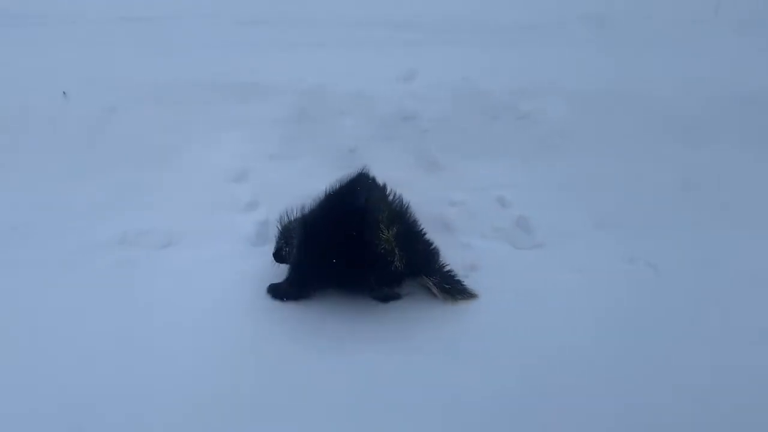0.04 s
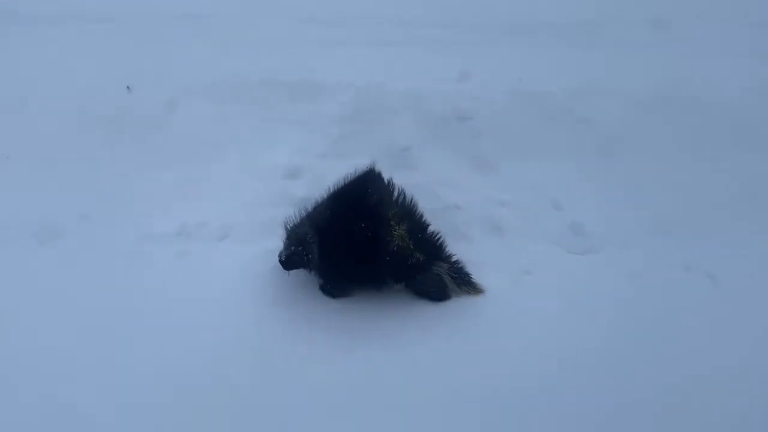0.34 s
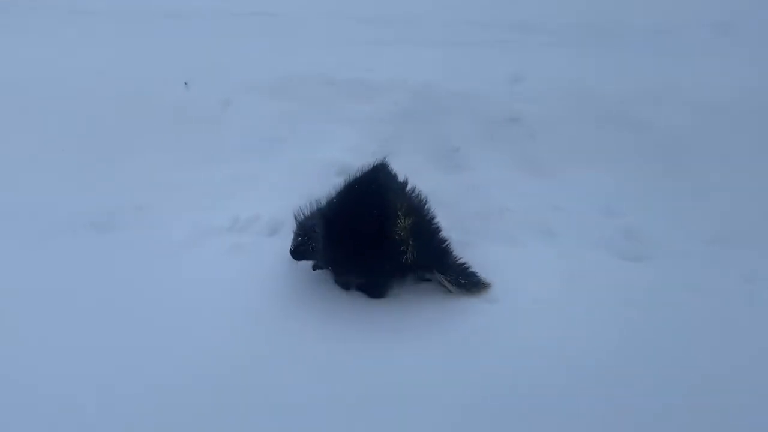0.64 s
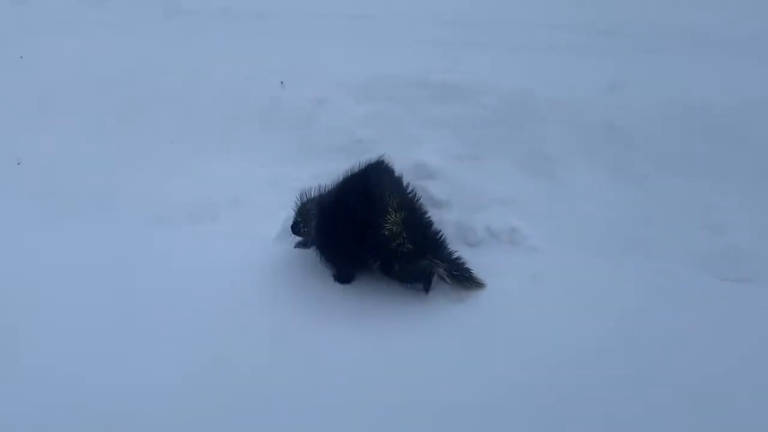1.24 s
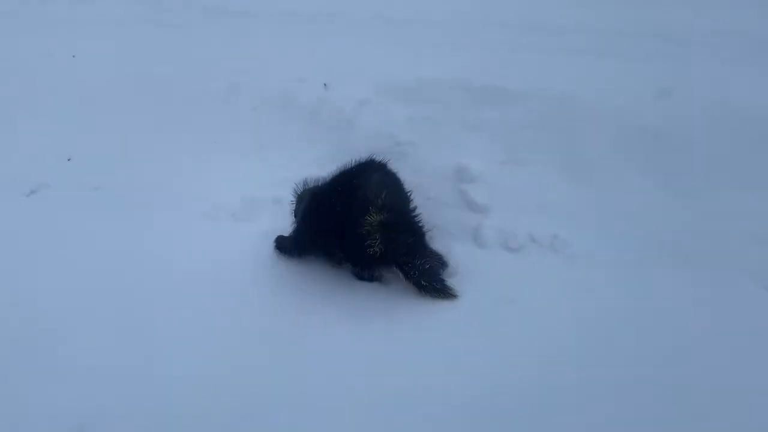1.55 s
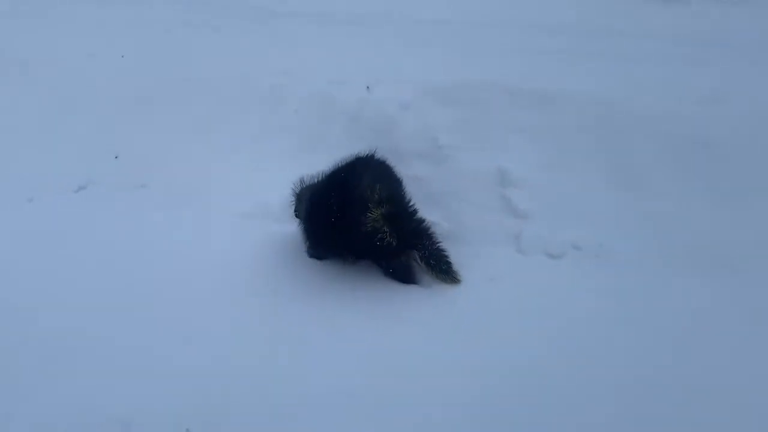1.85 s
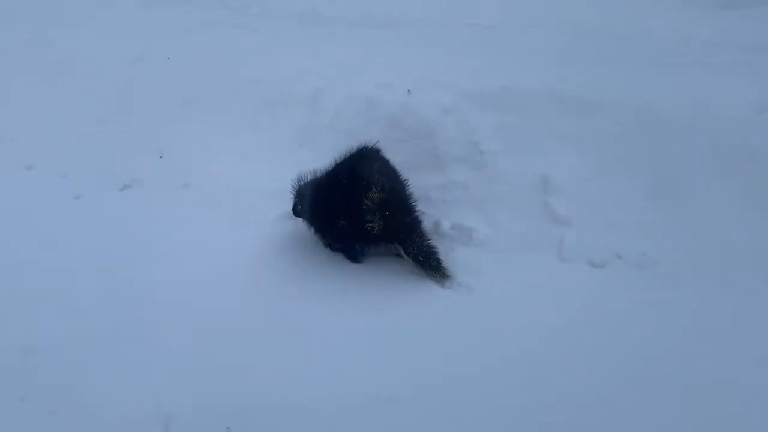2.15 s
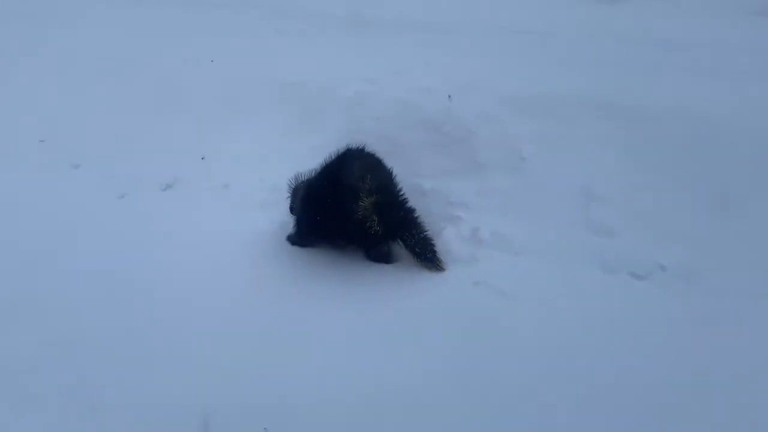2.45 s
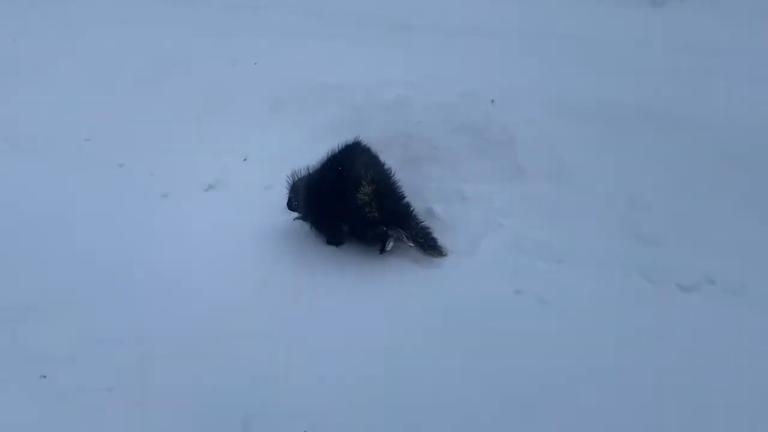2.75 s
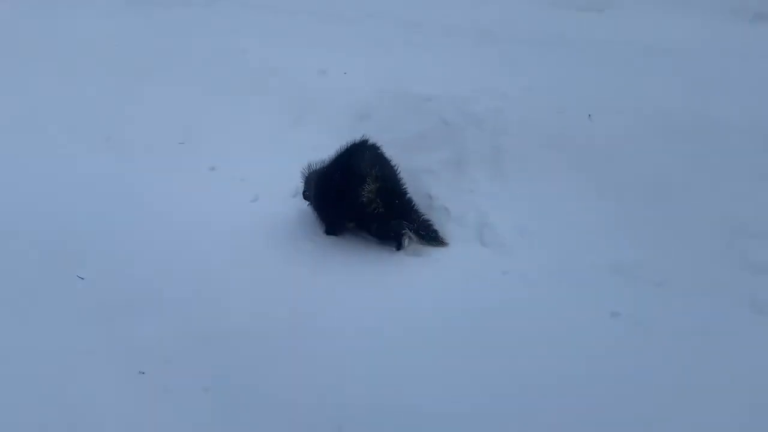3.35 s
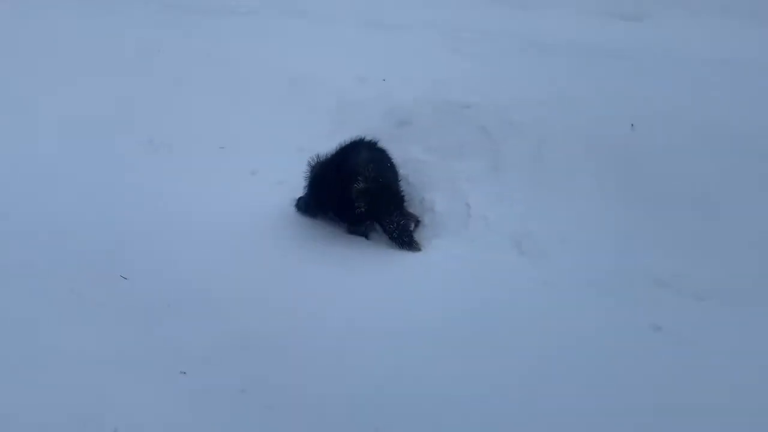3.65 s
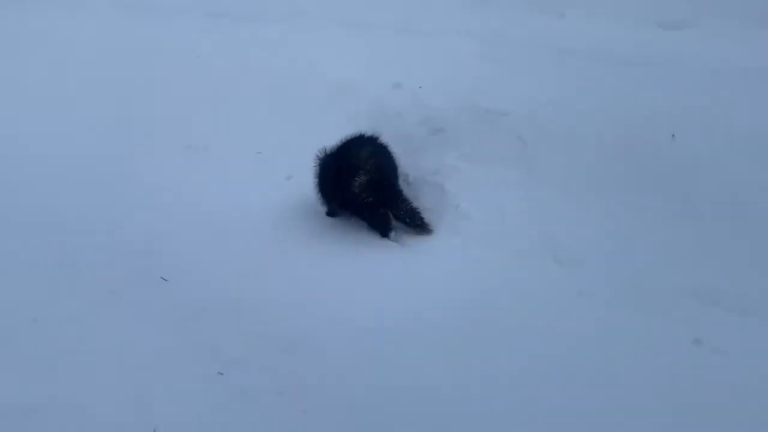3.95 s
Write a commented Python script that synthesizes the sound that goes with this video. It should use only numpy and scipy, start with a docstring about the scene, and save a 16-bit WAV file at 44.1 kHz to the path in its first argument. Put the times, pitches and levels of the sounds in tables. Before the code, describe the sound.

An engine idles nearby with a deep hum while wind thumps the microphone.

```python
"""An engine idles close by on open snow: a deep firing hum, light clatter and a rush of fan air.
Wind thumps the microphone, mostly in the first second and a half, among faint crisp rustles.
As the microphone slowly turns, the rush dulls and shifts between the ears, and a hollow sweeps up
through rush and clatter. From about 2 s the clatter comes forward and a few dry ticks sound."""
import sys
import numpy as np
from scipy import signal
from scipy.fft import rfft, irfft
from scipy.io import wavfile
from scipy.ndimage import uniform_filter1d, map_coordinates

SR = 44100
rng = np.random.default_rng(int(sys.argv[2]) if len(sys.argv) > 2 else 0)


def generate_wav(sig):
    """Save sig (samples, or channels by samples) to the path in sys.argv[1] as 16-bit PCM at SR."""
    pcm = np.round(np.clip(np.atleast_2d(sig).T, -1, 1) * 32767).astype(np.int16)
    wavfile.write(sys.argv[1], SR, pcm)


N = 176400
T = np.arange(N) / SR
HZ = np.maximum(np.arange(N // 2 + 1) * SR / N, 1)
FIRING_HZ, CYLINDERS = 62.13, 6


def from_db(db):
    """Decibels to gain."""
    return 10 ** (np.asarray(db) / 20)


def unit_rms(x):
    """Scale to rms 1."""
    return x / np.sqrt(np.mean(x ** 2) + 1e-20)


def in_time(points):
    """Control curve at every sample."""
    return np.interp(T, *np.transpose(points))


def over_hz(points):
    """Curve at every FFT bin, interpolated in log frequency."""
    hz, value = np.transpose(points)
    return np.interp(np.log(HZ), np.log(hz), value)


def drift(rate_hz):
    """Smooth random motion, mean 0, rms 1."""
    slow = irfft(rfft(rng.standard_normal(N)) / (1 + (HZ / rate_hz) ** 2), N)
    return unit_rms(slow - slow.mean())


def colour(x, spectrum):
    """Filter by a spectrum; rms 1."""
    return unit_rms(irfft(rfft(x) * from_db(over_hz(spectrum)), N))


def noise_pair(correlation):
    """White stereo noise with a given left-right correlation."""
    mid, side = rfft(rng.standard_normal((2, N)))
    correlation = np.clip(correlation, -.99, .99)
    return irfft(np.sqrt(1 + correlation) * mid + np.sqrt(1 - correlation) * side * [[1], [-1]], N)


def ports(x, left_db, left_lead_rad):
    """Level and phase difference between the two microphone ports, at constant power."""
    gain, twist, _ = np.broadcast_arrays(from_db(left_db), np.exp(.5j * left_lead_rad), HZ)
    return irfft(rfft(x) * np.array([gain * twist, 1 / twist]) * np.sqrt(2 / (1 + gain ** 2)), N)


def engine_tones(cycles, orders, waver_db=.47):
    """Wavering multiples of the engine cycle, in step as in a pulse train."""
    out = 0
    for order, level_db in orders:
        peak = np.sqrt(2) * from_db(level_db + waver_db * drift(2.5))
        out = out + peak * np.sin(2 * np.pi * order * cycles)
    return out


def throb(cycles, knock_depth, crank_depth):
    """Gain that beats twice per firing and once per crank turn."""
    crank_rad = 4 * np.pi * cycles
    return unit_rms(np.exp(knock_depth * np.cos(CYLINDERS * crank_rad) + crank_depth * np.cos(crank_rad)))


def exhaust_hum(cycles, left_lag_s=.00035):
    """Deep firing tones, uneven from one firing to the next."""
    # exhaust harmonics: cycle_order, level_db
    harmonics = [(4, -54.5), (6, -26), (8, -41.5), (10, -59.5), (12, -22), (14, -45), (18, -37),
                 (20, -62.5), (24, -46.5), (30, -53.5), (34, -56.5)]
    hum = engine_tones(cycles, harmonics)
    chug_db = drift(35)
    pan_db = .46 - .5 * T
    left, right = hum * from_db(chug_db + pan_db * [[.5], [-.5]])
    return np.array([np.interp(T - left_lag_s, T, left), right])


def clatter(cycles, repeat_share=.55):
    """Valve and injector noise, partly the same in every cycle, with a thin whine on top."""
    # knock spectrum: freq_hz, gain_db
    spectrum = [(250, -2.5), (340, -2), (450, -15.5), (660, 6.5), (1000, -1), (1250, -20), (1650, -8),
                (2300, -25.5), (5000, -42)]
    # knock envelope: time_s, level_db
    envelope = [(0, -58), (.7, -59), (1.4, -58.5), (2.2, -51.5), (2.8, -45), (3.3, -43.5), (3.65, -46),
                (4, -51.5)]
    # whine tones: cycle_order, mean_level_db
    whine_orders = [(52, -54), (54, -53.5), (64, -54), (66, -51.5)]
    # port balance: freq_hz, left_minus_right_db
    balance = [(300, 1), (450, 1.5), (650, -6), (1000, -12), (1300, -5.5), (1650, -3.5), (2500, -5)]
    # port phase: freq_hz, left_lead_rad
    lead = [(300, -1), (450, 3.0), (650, 2), (950, 2), (1250, 0.5), (1600, 4), (2200, 1.5)]
    cycle_samples = int(SR * CYLINDERS / FIRING_HZ)
    fresh, pattern = rng.standard_normal((2, N))
    position = cycles % 1 * cycle_samples
    repeated = unit_rms(np.interp(position, np.arange(cycle_samples), pattern[:cycle_samples]))
    noise = np.sqrt(repeat_share) * repeated + np.sqrt(1 - repeat_share) * fresh
    knocks = colour(noise * throb(cycles, knock_depth=.5, crank_depth=.1), spectrum)
    level_db = in_time(envelope)
    whine = engine_tones(cycles, whine_orders) * from_db(.37 * (level_db - level_db.mean()))
    return ports(knocks * from_db(level_db) + whine, over_hz(balance), over_hz(lead))


def fan_rush(cycles, rush_db=-37.5, tone_db=-56.5, tone_hz=2037, tone_width_hz=45):
    """Fan air with one narrow resonance; the treble is shaded as the microphone turns."""
    # rush before the turn: freq_hz, gain_db
    spectrum = [(200, -14), (330, -3), (480, 7), (700, 2), (950, -0.5), (1150, -2), (1400, -5),
                (1750, -7.5), (2050, -11.5), (2500, -13), (3200, -17), (4100, -25.5), (5600, -27),
                (6800, -35.5), (10000, -46), (15000, -52)]
    # likeness of the ports: freq_hz, correlation
    likeness = [(200, 1), (500, 0.89), (1400, 0.93), (2600, 0.55), (3700, 0.93), (6000, 0.66), (12000, .6)]
    # shading at weight 1: time_s, gain_db
    shading = [(0, 0), (.6, -.3), (1.2, -2), (1.9, -5), (2.6, -8.5), (3.2, -12), (4, -16)]
    # shading by band: centre_hz, weight
    bands = [(330, -.1), (470, 0.9), (700, 0.4), (1050, 0.5), (1700, 0.1), (2400, 0.7), (3400, .85),
             (4700, 2), (9000, 2.3)]
    # port balance: freq_hz, left_minus_right_db
    balance = [(350, 4.5), (600, -7.5), (950, -4), (1300, -6), (1650, -0.5), (1950, -2), (2700, -3.5),
               (3500, 11), (4400, -1.5), (5800, 5), (8000, 5)]
    # port phase: freq_hz, left_lead_rad
    lead = [(200, -4.5), (400, -3), (850, -3.5), (1450, -3), (1900, -5), (2800, -7), (3600, -7),
            (4500, -5.5), (7000, -6.5)]
    air_bins = rfft(colour(noise_pair(over_hz(likeness)), spectrum))
    shade_db = in_time(shading)
    rush = 0
    for centre_hz, weight in bands:
        band = over_hz([(hz, float(hz == centre_hz)) for hz, _ in bands])
        rush = rush + irfft(air_bins * band, N) * from_db(rush_db + weight * shade_db)
    resonance = 1 / (1 + (2 * (HZ - tone_hz) / tone_width_hz) ** 2)
    tone = unit_rms(irfft(rfft(rng.standard_normal(N)) * resonance, N))
    rush += tone * from_db(tone_db + .38 * shade_db)
    rush *= throb(cycles, knock_depth=.053, crank_depth=.053)
    return ports(rush, over_hz(balance), over_hz(lead))


def turning(x, lead_s_per_s=.00004):
    """The left port hears ever earlier as the microphone turns."""
    left = map_coordinates(x[0], [(T + lead_s_per_s * T) * SR], mode="nearest")
    return np.array([left, x[1]])


def hollow_sweep(x, width_oct=.17, crest_below_oct=.33, side_share=.45):
    """A dip climbs as the microphone turns, deepest in what the ports share; a crest lies below it."""
    # dip path: time_s, centre_hz, depth_db
    path = [(0, 830, 2.5), (.7, 880, 3.5), (1.3, 950, 6), (1.8, 1040, 3.5), (2.4, 1217, 4.5),
            (3.099, 1297, 4.5), (4, 1337, 4.5)]
    # crest: time_s, height_db
    crest = [(0, -1), (1.8, 0.5), (2.6, 0.5), (3.3, 3), (4, 3.5)]
    hz, frame_s, bins = signal.stft([x[0] + x[1], x[0] - x[1]], SR, nperseg=2048)
    time_s, centre_hz, depth_db = np.transpose(path)
    octaves = np.log2(np.maximum(hz, 1)[:, None] / np.interp(frame_s, time_s, centre_hz))
    dip_db = np.interp(frame_s, time_s, depth_db) * np.exp(-(octaves / width_oct) ** 2)
    crest_shape = np.exp(-((octaves + crest_below_oct) / width_oct) ** 2)
    crest_db = np.interp(frame_s, *np.transpose(crest)) * crest_shape
    bins *= from_db([crest_db - dip_db, -side_share * dip_db])
    mid, side = signal.istft(bins, SR)[1][:, :N]
    return np.array([mid + side, mid - side]) / 2


def steadied(x):
    """Hold stereo noise near rms 1."""
    power = uniform_filter1d(np.mean(x ** 2, axis=0), size=900)
    return x / np.sqrt(power + 1e-9)


def wind():
    """Low turbulence on the microphone, and short buffets with a higher thud."""
    # rumble spectrum: freq_hz, gain_db
    spectrum = [(15, -41.5), (32, -17), (48, 2.5), (65, 1.5), (95, 4), (140, -1.5), (210, -10), (290, -19),
                (420, -29), (700, -44.5), (3000, -110)]
    # rumble envelope: time_s, level_db
    envelope = [(0, -25), (.45, -26.5), (.7, -25.5), (1.08, -28.5), (1.35, -26), (1.9, -27.5), (2.4, -29.5),
                (3, -29), (3.5, -28.5), (3.75, -34), (4, -22)]
    # buffets: centre_s, half_width_s, body_db, thud_db
    buffets = [(0.224, 0.06, -23, -45.5), (.266, .01, -29, -33), (0.57, 0.03, -30.5, -32),
               (0.7, 0.073, -22.5, -34.5), (0.791, 0.02, -21.5, -31), (0.88, 0.052, -21.5, -28),
               (1.204, 0.026, -32, -30), (1.27, 0.025, -18, -31), (1.36, 0.026, -30.5, -32.5),
               (1.454, 0.028, -24.5, -35.5), (1.74, 0.026, -27, -50), (1.945, 0.055, -23, -51),
               (2.427, 0.023, -33, -35), (3.2, 0.037, -31, -31), (3.36, 0.05, -32, -36),
               (3.55, 0.06, -22, -46.5)]
    # buffet body: freq_hz, gain_db
    body_spectrum = [(15, -34.5), (45, -6.5), (70, 11), (98, 6.5), (135, -3.5), (220, -12), (500, -71.5),
                     (3000, -120)]
    # buffet thud: freq_hz, gain_db
    thud_spectrum = [(20, -43.5), (80, -20), (160, 9), (230, 2.5), (330, -10.5), (480, -17), (900, -40),
                     (3000, -93.5)]
    out = colour(noise_pair(.74), spectrum) * from_db(in_time(envelope))
    body = steadied(colour(noise_pair(.93), body_spectrum))
    thud = steadied(colour(noise_pair(.93), thud_spectrum))
    for centre_s, half_width_s, body_db, thud_db in buffets:
        swell = np.exp(-((T - centre_s) / half_width_s) ** 2)
        out += swell * (from_db(body_db) * body + from_db(thud_db) * thud)
    return out


def grains(per_s=3000):
    """Random stereo impulses."""
    return noise_pair(.33) * (rng.random(N) < per_s / SR)


def rustles(attack_s=.007, release_s=.0083, tail_s=.073, tail_db=-7.5, clump_db=2):
    """Short strokes of crisp grains that clump and trickle out."""
    # strokes: start_s, length_s, level_db
    strokes = [(0, 0.22, -68.5), (0.377, 0.011, -61), (0.609, 0.047, -58.5), (0.656, 0.073, -69.5),
               (0.81, 0.059, -67.5), (1.028, 0.038, -65.5), (1.142, 0.074, -70.5), (1.394, 0.092, -65),
               (1.571, 0.047, -68), (1.933, 0.057, -68), (2.131, 0.082, -67.5), (2.31, 0.039, -65),
               (2.653, 0.053, -70), (2.759, 0.087, -67.5), (2.845, 0.025, -64), (2.892, 0.021, -76),
               (2.991, 0.054, -72), (3.29, 0.041, -67), (3.505, 0.052, -66.5), (3.652, 0.042, -73)]
    # treble colour as heard, notched near 8.5 and 12 kHz: freq_hz, gain_db
    treble = [(500, -30.5), (2000, -6.5), (4500, 3), (7000, 1), (8500, -7.5), (10200, 7), (12300, -10.5),
              (14300, 0.5), (15600, -5)]
    envelope = 0
    for start_s, length_s, level_db in strokes:
        rise = np.clip((T - start_s) / attack_s, 0, 1)
        after_s = np.maximum(T - start_s - length_s, 0)
        fall = np.exp(-after_s / release_s) + from_db(tail_db) * np.exp(-after_s / tail_s)
        envelope = envelope + from_db(level_db) * rise * fall
    clumps = grains() * from_db(clump_db * drift(120))
    return envelope * colour(clumps, treble)


def brushing(flicker_db=2):
    """A fine continuous rustle that fades away."""
    # treble colour as heard, notched near 8.5 and 12 kHz: freq_hz, gain_db
    treble = [(2000, -24), (4200, -7), (4800, 1.5), (5800, 2), (6400, -5.5), (8300, -14), (10000, -4.5),
              (12300, -18.5), (14500, -14.5)]
    # fade: time_s, level_db
    envelope = [(0, -62.5), (.3, -64), (.55, -67.5), (.9, -66.5), (1.4, -71.5), (2.2, -80), (3.6, -82),
                (3.8, -86)]
    return colour(grains(), treble) * from_db(in_time(envelope) + flicker_db * drift(15))


def hiss(level_db=-63.5):
    """Faint, steady, wide noise."""
    # hiss spectrum: freq_hz, gain_db
    spectrum = [(1000, 6.5), (3000, 2), (5500, 3.5), (7500, -5), (10500, -10), (15000, -25.5)]
    return from_db(level_db) * colour(noise_pair(.1), spectrum)


def thumps(end_hz=75, sag_s=.016):
    """Puffs of air on the microphone swell and die within a few cycles as their pitch sags."""
    # puffs: start_s, peak_db, start_hz, swell_s
    puffs = [(0.259, -21.5, 367, 0.0017), (.53, -19, 280, 0.007), (0.825, -15, 223, 0.01),
             (.871, -13, 189, .004), (0.897, -13.5, 228, .011), (1.191, -17.5, 304, 0.007),
             (1.208, -12.5, 110.3, .008), (1.433, -20.5, 280, 0.0036), (1.494, -21.5, 208, 0.013),
             (1.836, -13, 80, 0.013), (2.145, -18, 75, .012), (2.256, -17, 75, .01),
             (3.182, -33, 258, 0.008)]
    out = 0
    for start_s, peak_db, start_hz, swell_s in puffs:
        age_s = np.maximum(T - start_s, 0)
        cycles = end_hz * age_s + (start_hz - end_hz) * sag_s * (1 - np.exp(-age_s / sag_s))
        envelope = (age_s / swell_s * np.exp(1 - age_s / swell_s)) ** 2
        out = out + from_db(peak_db) * envelope * np.sin(2 * np.pi * (cycles + rng.random()))
    return out


def ticks():
    """Tiny dry noise bursts, each in its own band; a narrow band rings."""
    # bursts: start_s, level_db, centre_hz, edge_to_centre_ratio, decay_s
    bursts = [(2.445, -47, 3220, 1.1, 0.0045), (2.448, -54.5, 4900, 1.43, .006),
              (2.721, -49.5, 2600, 1.4, .005), (3.107, -55, 6500, 1.5, 0.0068),
              (3.543, -57, 5500, 1.6, 0.0044), (3.734, -33.5, 900, 1.4, 0.0018),
              (1.975, -41.5, 950, 1.7, 0.0026), (2.86, -56, 11500, 1, .003)]
    out, white = 0, noise_pair(.5)
    for start_s, level_db, centre_hz, ratio, decay_s in bursts:
        ratio = max(ratio, 1.02)
        band = signal.butter(2, [centre_hz / ratio, centre_hz * ratio], "band", fs=SR, output="sos")
        burst = white * (T >= start_s) * np.exp(-np.abs(T - start_s) / decay_s) + 1e-18
        band_rms = signal.sosfilt(band, white).std()
        out = out + from_db(level_db) * signal.sosfilt(band, burst) / band_rms
    return out


def scene():
    """One engine speed drives hum, clatter and fan; wind and small noises lie on top."""
    cycle_hz = FIRING_HZ / CYLINDERS * (1 + .002 * drift(2.4))
    cycles = np.cumsum(cycle_hz) / SR
    hum = exhaust_hum(cycles)
    wind_lag_s = .00032
    gusts = ports(wind() + thumps(), left_db=0, left_lead_rad=-2 * np.pi * HZ * wind_lag_s)
    air = hiss()
    machinery = hollow_sweep(clatter(cycles) + turning(fan_rush(cycles)))
    return hum + machinery + gusts + air + rustles() + brushing() + ticks()


def record(dry, cutoff_hz=15600):
    """Steep low-pass."""
    return signal.sosfilt(signal.ellip(10, .1, 80, cutoff_hz, fs=SR, output="sos"), dry)


dry = scene()
out = record(dry)
generate_wav(out)
```